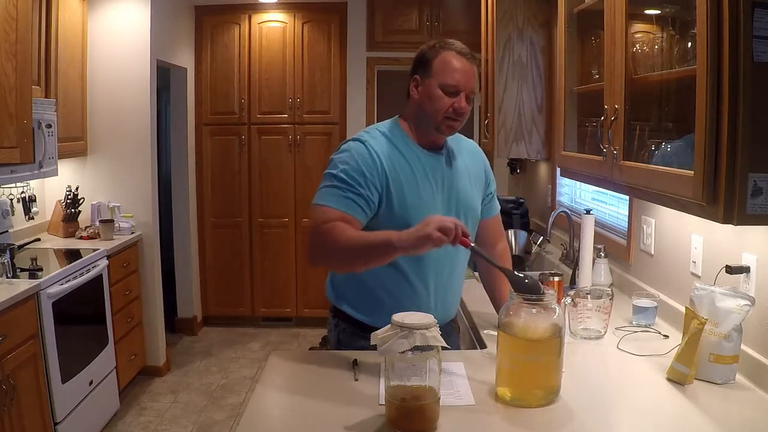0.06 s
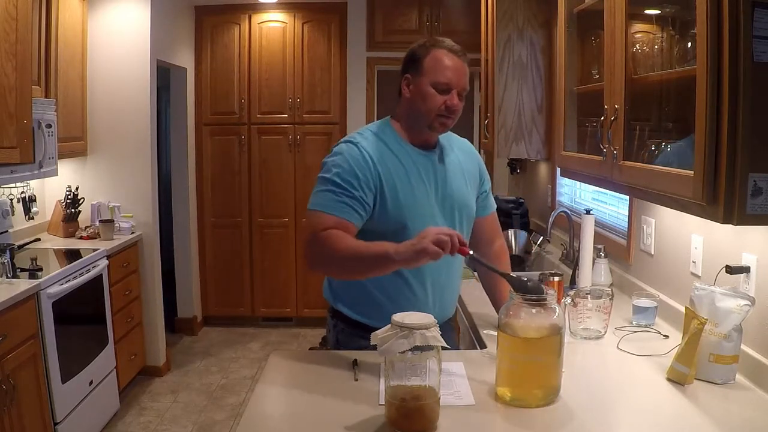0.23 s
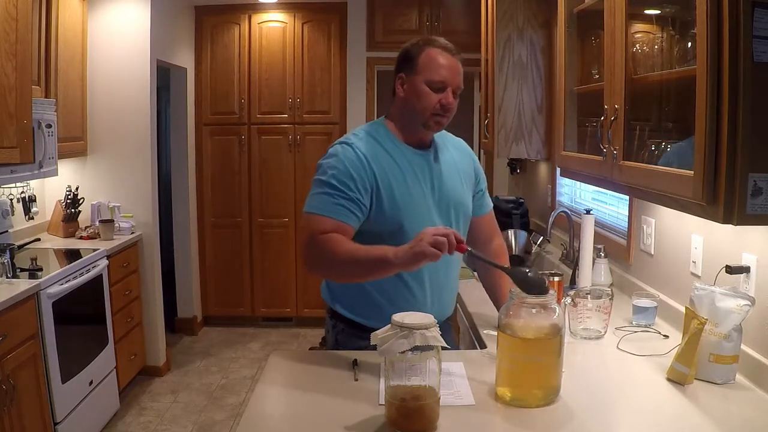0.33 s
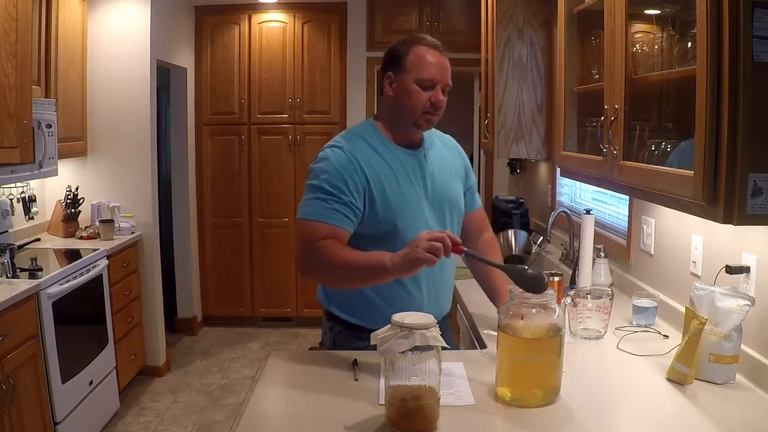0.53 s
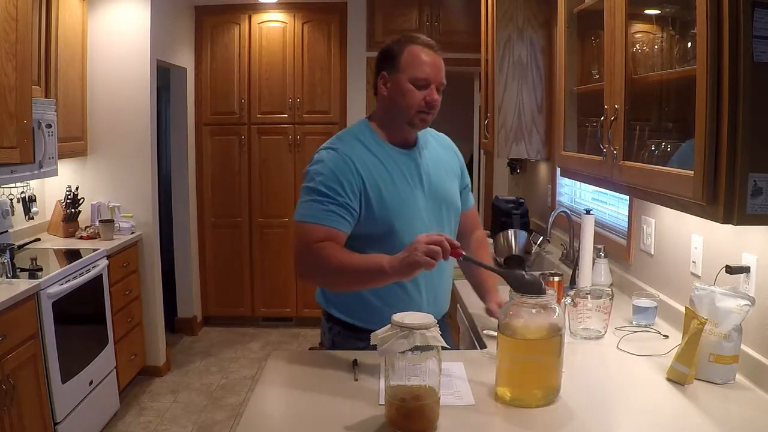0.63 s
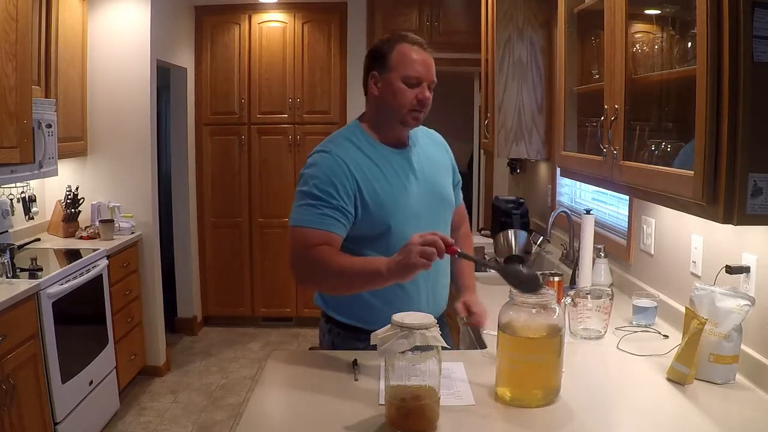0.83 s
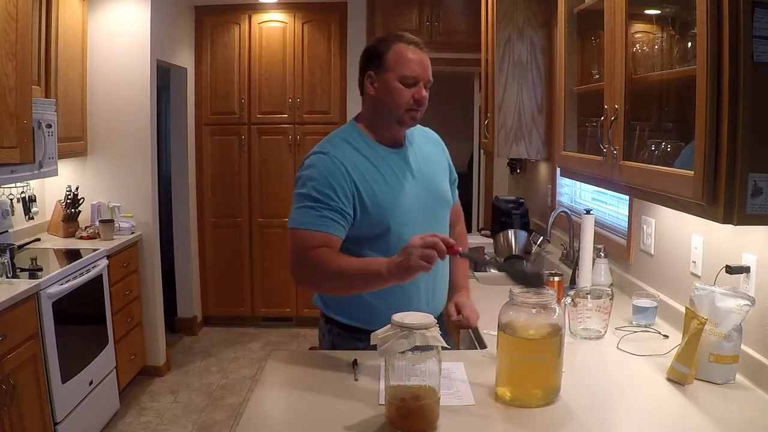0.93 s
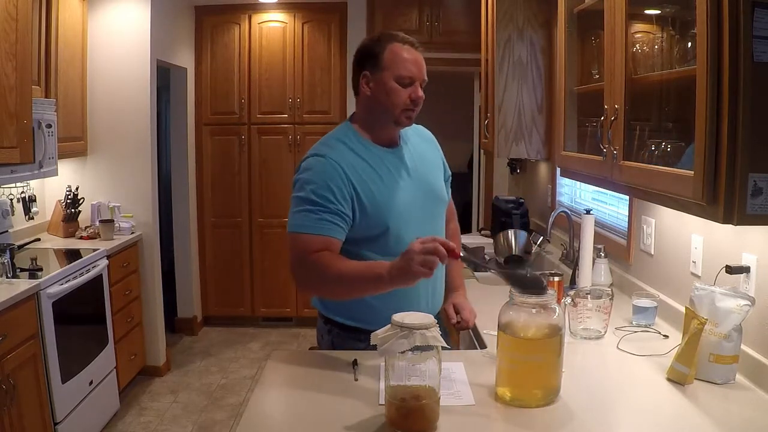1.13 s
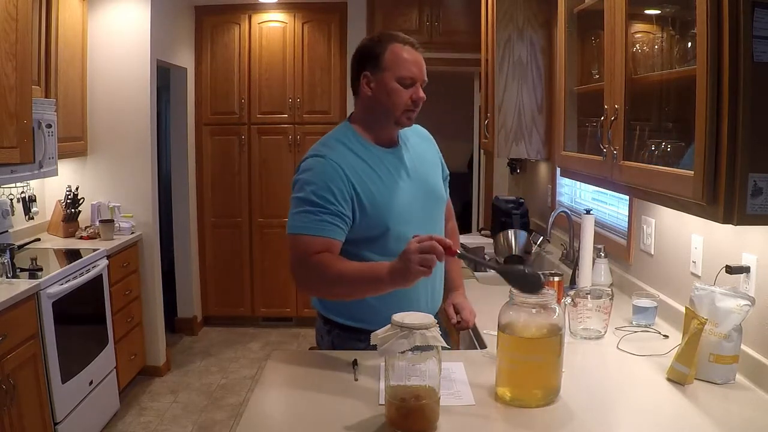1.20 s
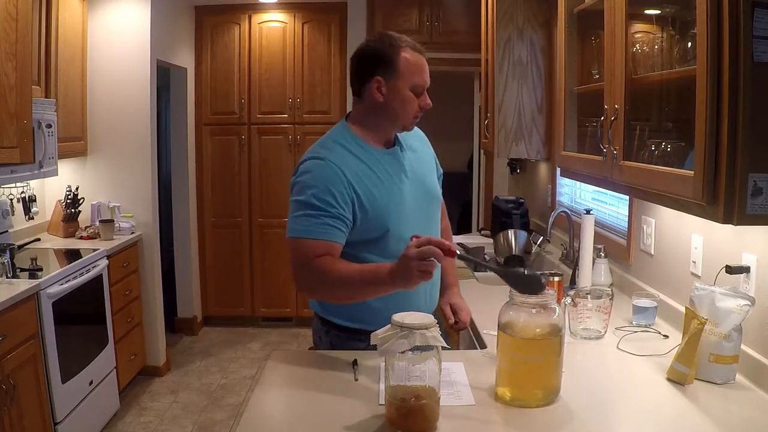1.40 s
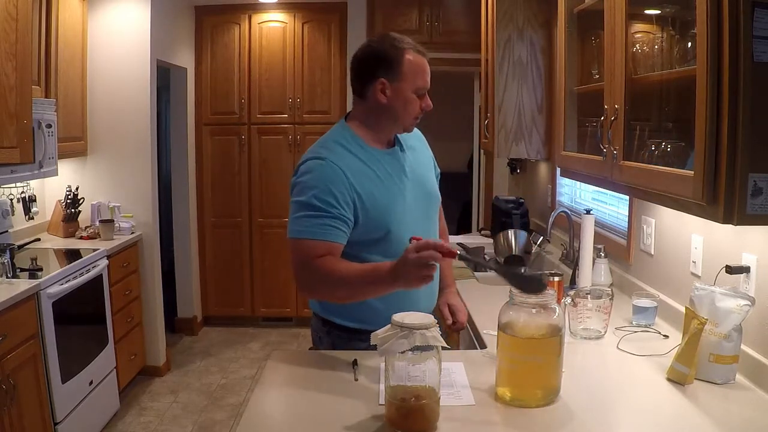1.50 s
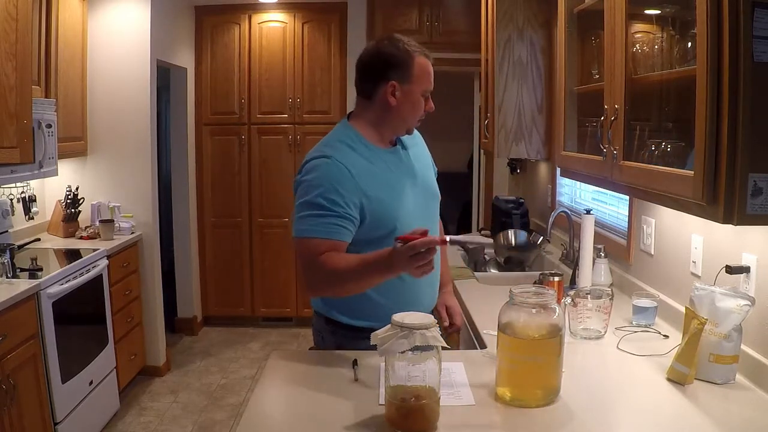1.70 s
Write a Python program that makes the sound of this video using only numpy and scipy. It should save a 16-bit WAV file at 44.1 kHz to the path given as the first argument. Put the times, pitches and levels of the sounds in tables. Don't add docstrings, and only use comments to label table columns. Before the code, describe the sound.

Metal spoon tapping a full glass jar: eight evenly spaced knocks at about 0.1, 0.3, 0.5, 0.65, 0.85, 1.0, 1.2 and 1.4 seconds. Each is a woody, hollow clunk with a small click, brief steel ring and faint glass tone; the sixth is brightest, the last softest. Short hard kitchen echoes, distant mono microphone, soft low hum, and a very faint handling rustle peaking near 1.55.

```python
import sys
import numpy as np
from scipy import signal
from scipy.fft import rfft, irfft
from scipy.io import wavfile
from scipy.ndimage import uniform_filter1d

SR = 44100
rng = np.random.default_rng(int(sys.argv[2]) if len(sys.argv) > 2 else 0)


def amplitude_ratio(level_db):
    exponent = np.asarray(level_db, float) / 20
    return 10 ** exponent


def dump(signal):
    limited = np.clip(np.atleast_2d(signal).T, -1, 1)
    pcm = np.round(limited * 32767).astype(np.int16)
    wavfile.write(sys.argv[1], SR, pcm)


N = 77175
T_S = np.arange(N) / SR

# start in seconds, bowl knock level in dB, jar body level in dB, counter thump level in dB.
TAPS = [
    (0.112, -12, -24, -45),
    (0.275, -12, -22.5, -46),
    (0.478, -10.5, -21.5, -43),
    (0.652, -10, -20, -42),
    (0.851, -11, -21.5, -43),
    (1.023, -10, -17.5, -37.5),
    (1.21, -11.5, -21.5, -38),
    (1.412, -15.5, -31.5, -50.5),
]
# start in seconds (for reading only, TAPS sets the timing), glass deep, glass
# upper, glass lower and steel ring levels in dB.
RINGS = [
    (0.111, -42.5, -42, -43, -60),
    (0.274, -42, -38.5, -49, -57),
    (0.477, -67, -37.5, -47.5, -61.5),
    (0.649, -42.5, -33, -47.5, -60),
    (0.85, -40, -31, -55.5, -58),
    (1.025, -39, -26.5, -46.5, -48.5),
    (1.213, -35.5, -31, -51, -55),
    (1.41, -32.5, -32, -48.5, -56.5),
]

# level in dB, t60 in seconds.
GLASS_HZ = [1944, 2188, 3031, 3941, 2542]
GLASS_UPPER = [(2.5, 0.54), (-31.5, 0.77), (-16, 0.17), (-34, 0.67), (-41.5, 0.9)]
# frequency in Hz, level in dB, t60 in seconds.
GLASS_LOWER = [(972, 1, 2.5)]
GLASS_DEEP = [(311, -16, 2.5)]
GLASS_SCATTER_DB, GLASS_SWELL_S, GLASS_SWELL_DB, GRIP_S = 0.8, 0.016, -4.5, 0.0013

# frequency in Hz, level in dB, t60 in seconds.
BOWL_MODES = [(1250, -17, .09),
              (1272.7, -7.5, 0.12), (979, -14.5, 0.048), (1565, -37, 0.27), (2260, -30.5, 0.053),
        (1272, -32, 0.055)]
BODY_MODES = [(488, -1, .1),
              (401, -14.5, 0.14), (607.3, -6.5, 0.072), (776, -9.5, 0.047), (428, -14.5, 0.15),
        (510.9, 5.5, 0.045)]
COUNTER = [(74.4, -0.5, 0.17), (140.5, 0, 0.41), (174, 19.5, 0.067), (248.4, 20, 0.072), (303, 11.5, 0.23)]
KNOCK_SCATTER_DB, KNOCK_LATE_S, CONTACT_S = 1.2, 0.0003, 0.002
THUMP_LATE_S, THUMP_S = 0.00403, 0.0038

# level in dB, t60 in seconds.
STEEL_HZ = [3523, 3698, 4430, 7250, 5556, 6648, 7139, 7381, 7525, 8012, 9265, 10140, 12560, 13460]
STEEL = [(-1, 0.18), (-8.5, 0.21), (-7.5, 0.22), (-10, 0.053), (-7, 0.096), (-4.5, 0.073), (-2.5, 0.1),
         (0, 0.054), (-6.5, 0.14), (4, 0.1), (-6, 0.074), (-8, 0.13), (-25.5, 0.053), (-13.5, 0.058)]
# level in dB, t60 in seconds.
HANDLE_HZ = [2438, 3142, 3196, 3560, 3589, 4047, 4620, 5213, 5480]
HANDLE = [(-9.5, 0.14), (-13.5, 0.4), (-42, 0.39), (-6.5, 0.41), (-20, 0.23), (-14.5, 0.19), (-4, 0.04),
          (-9.5, 0.083), (-20.5, 0.16)]
STEEL_DB, HANDLE_DB, STEEL_SCATTER_DB = 8.5, -34, 2.5

# frequency in Hz, level in dB.
CLICK_COLOUR = [(500, -23), (1200, 3.5), (2200, -5.5), (3500, -14.5), (6000, -13.5), (8000, -21),
                (11000, -26.5), (15000, -52.5)]
CLICK_DB, CHATTER_S = -31, 0.0014
CLICK_STEEL_SHARE = 0.81

# frequency in Hz, t60 in seconds.
ROOM_T60 = [(80, 0.66), (300, 0.34), (1000, 0.46), (3000, 0.32), (8000, .33), (14000, 0.18)]
ROOM_LATE_S, ROOM_BUILD_S, EARLY_DB, EARLY_S = 0.0045, 0.00095, 2, 0.0071
ROOM_KNOCK_DB, ROOM_GLASS_DB, ROOM_STEEL_DB, ROOM_CLICK_DB = -9, -11, -0.5, 10.5

# frequency in Hz, level in dB.
RUSTLE_COLOUR = [(600, -35.5), (1500, 4), (3000, -3), (5000, -8), (8000, -17.5), (12000, -46)]
# time in seconds, level in dB.
RUSTLE_SWELL = [(0, -98), (.5, -92.5), (1.3, -69.5), (1.55, -64.5), (1.75, -69.5)]
# frequency in Hz, level in dB per Hz.
HUM_COLOUR = [(15, -32), (25, -3.5), (183, -5.5), (240, 2.5), (582, -13), (741, -10.5), (945, -10),
              (1490, -21.5), (15500, -37)]
HUM_DB, FLICKER_DB = -57.5, 0.8


def ring(modes, starts_s, levels_db, scatter_db, rise_s, stopped=False):
    modes, out = np.array(modes, float), np.zeros(N)
    hz, mode_db, t60_s = modes[:, :1], modes[:, 1], modes[:, 2:]
    chance = rng.standard_normal((len(starts_s), len(modes)))
    for k, (start_s, db) in enumerate(zip(starts_s, levels_db)):
        age_s = np.clip(T_S - start_s, 0, None)
        size = amplitude_ratio(db + mode_db + scatter_db * chance[k])[:, None]
        decay = 1000. ** (-age_s / t60_s)
        tone = (size * np.sin(2 * np.pi * hz * age_s) * decay).sum(axis=0)
        if stopped and k + 1 < len(starts_s):
            tone = tone * np.exp(-np.clip(T_S - starts_s[k + 1], 0, None) / GRIP_S)
        out += tone * (1 - np.exp(-age_s / rise_s)) ** 2
    return out


def glass_ring(starts_s, deep_db, upper_db, lower_db):
    upper = np.c_[GLASS_HZ, GLASS_UPPER]
    prompt = ring(upper, starts_s, upper_db, GLASS_SCATTER_DB, 0.0002, stopped=True)
    swelling = ring(upper, starts_s, upper_db + GLASS_SWELL_DB, GLASS_SCATTER_DB, GLASS_SWELL_S, stopped=True)
    lower = ring(GLASS_LOWER, starts_s, lower_db, GLASS_SCATTER_DB, GLASS_SWELL_S, stopped=True)
    deep = ring(GLASS_DEEP, starts_s, deep_db, GLASS_SCATTER_DB, 0.0033, stopped=True)
    return prompt + swelling + lower + deep


def knocks(starts_s, bowl_db, body_db, counter_db):
    knock_s = starts_s + KNOCK_LATE_S
    bowl = ring(BOWL_MODES, knock_s, bowl_db, KNOCK_SCATTER_DB, CONTACT_S)
    body = ring(BODY_MODES, knock_s, body_db, KNOCK_SCATTER_DB, CONTACT_S)
    counter = ring(COUNTER, starts_s + THUMP_LATE_S, counter_db, KNOCK_SCATTER_DB, THUMP_S)
    return bowl + body + counter


def spoon_steel(starts_s, steel_db, bowl_db):
    steel = ring(np.c_[STEEL_HZ, STEEL], starts_s, steel_db + STEEL_DB, STEEL_SCATTER_DB, 0.00033)
    handle = ring(np.c_[HANDLE_HZ, HANDLE], starts_s, bowl_db + HANDLE_DB, STEEL_SCATTER_DB, 0.0013)
    return steel + handle


def contact_clicks(starts_s, levels_db):
    out = np.zeros(N)
    for start_s, db in zip(starts_s, levels_db):
        age_s = T_S - start_s
        chatter = 0.39 * (age_s > 0) * np.exp(-np.abs(age_s) / CHATTER_S) * rng.standard_normal(N)
        impulse = 3 * np.sinc(age_s * SR - 9) * (np.abs(age_s) < 0.002)
        out += amplitude_ratio(db + CLICK_DB) * (chatter + impulse)
    return 40 * tint(out, CLICK_COLOUR)


def kitchen(x):
    age_s = np.clip(np.arange(SR) / SR - ROOM_LATE_S, 0, None)
    tail = sum(noise * 1000. ** (-age_s / curve(ROOM_T60, hz)) for hz, noise in bands(SR))
    build = 1 - np.exp(-age_s / ROOM_BUILD_S)
    early = 1 + amplitude_ratio(EARLY_DB) * np.exp(-age_s / EARLY_S)
    tail = tail * build * early
    return signal.fftconvolve(x, tail / np.sqrt(np.sum(tail ** 2)))[:N]


def rustle():
    return steady_noise(RUSTLE_COLOUR) * amplitude_ratio(np.interp(T_S, *np.array(RUSTLE_SWELL).T))


def hum():
    return steady_noise(HUM_COLOUR) * amplitude_ratio(HUM_DB)


def steady_noise(colour):
    hold = SR // 12
    out = 0
    for _, noise in bands(N):
        walk = np.repeat(rng.standard_normal(N // hold + 1), hold)
        walk = uniform_filter1d(walk, hold)[:N]
        out = out + noise * amplitude_ratio(FLICKER_DB * walk)
    out = tint(out, colour)
    return out / out.std()


def bands(count):
    f_hz = np.arange(count // 2 + 1) * SR / count + 1
    for hz in 22 * 2 ** (np.arange(20) / 2):
        share = np.cos(np.pi * np.clip(np.log2(f_hz / hz), -.5, .5))
        yield hz, irfft(rfft(rng.standard_normal(count)) * share, count)


def tint(x, table):
    f_hz = np.arange(len(x) // 2 + 1) * SR / len(x)
    return irfft(rfft(x) * amplitude_ratio(curve(table, f_hz)), len(x))


def curve(table, hz):
    table = np.array(table, float)
    return np.interp(np.log(np.maximum(hz, 1)), np.log(table[:, 0]), table[:, 1])


def scene():
    starts_s, bowl_db, body_db, counter_db = np.array(TAPS, float).T
    _, deep_db, upper_db, lower_db, steel_db = np.array(RINGS, float).T
    click_db = CLICK_STEEL_SHARE * (steel_db + 30) + (1 - CLICK_STEEL_SHARE) * bowl_db

    glass = glass_ring(starts_s, deep_db, upper_db, lower_db)
    knock = knocks(starts_s, bowl_db, body_db, counter_db)
    steel = spoon_steel(starts_s, steel_db, bowl_db)
    click = contact_clicks(starts_s, click_db)

    to_room = amplitude_ratio(ROOM_KNOCK_DB) * knock + amplitude_ratio(ROOM_GLASS_DB) * glass
    to_room = to_room + amplitude_ratio(ROOM_STEEL_DB) * steel + amplitude_ratio(ROOM_CLICK_DB) * click
    mix = glass + knock + steel + click + kitchen(to_room) + rustle() + hum()
    return mix[None]


def top_cut(x):
    return signal.sosfilt(signal.butter(12, 15660, fs=SR, output="sos"), x)


def record(dry):
    low_pass = signal.ellip(8, .2, 70, 15500, fs=SR, output="sos")
    mix = signal.sosfilt(low_pass, dry)
    return top_cut(mix)


dry = scene()
out = record(dry)
dump(out)
```